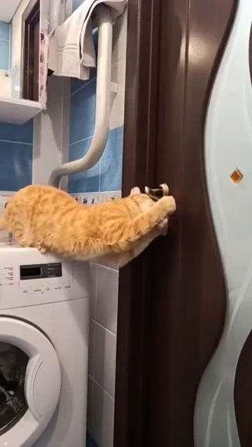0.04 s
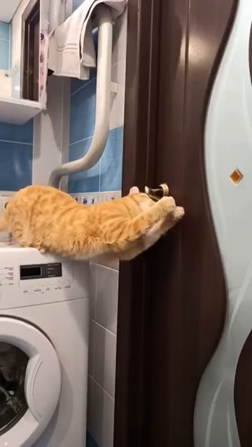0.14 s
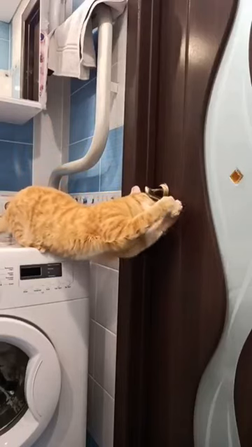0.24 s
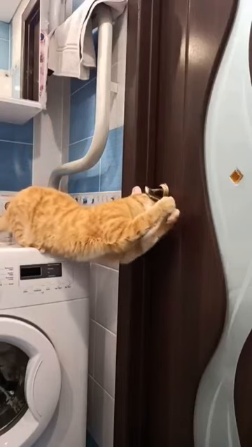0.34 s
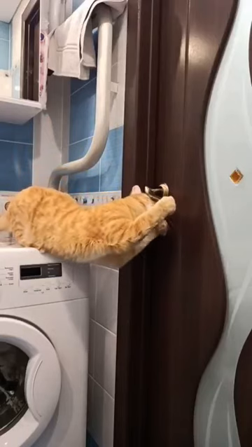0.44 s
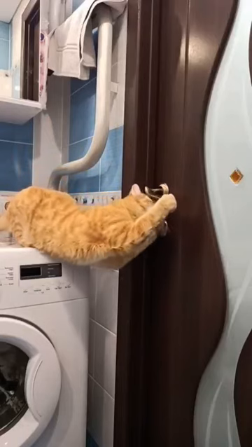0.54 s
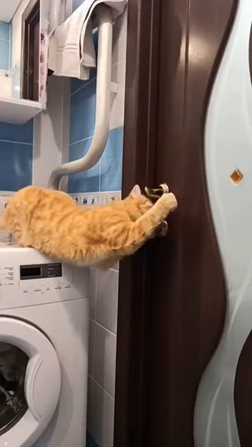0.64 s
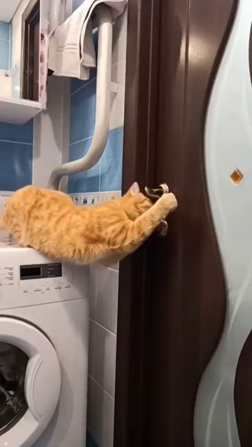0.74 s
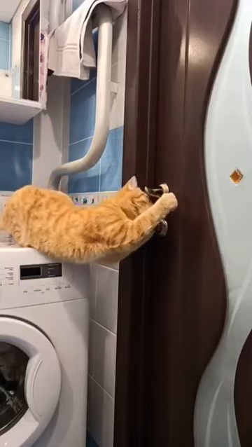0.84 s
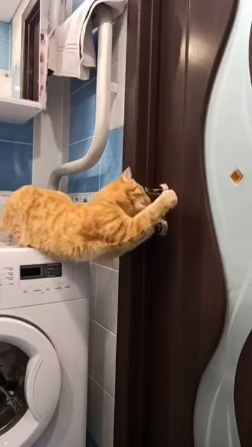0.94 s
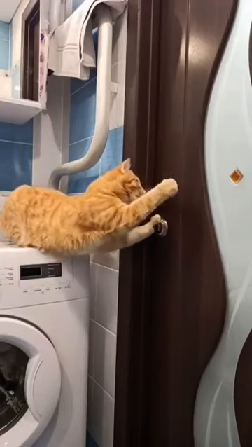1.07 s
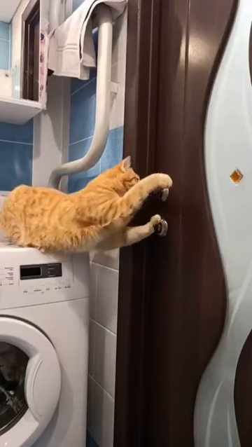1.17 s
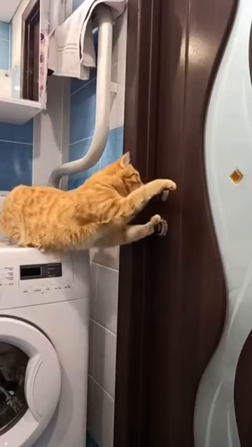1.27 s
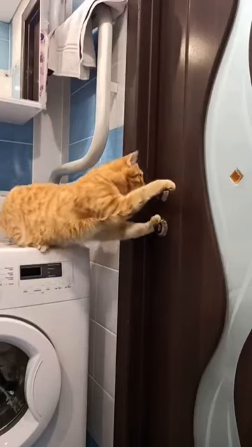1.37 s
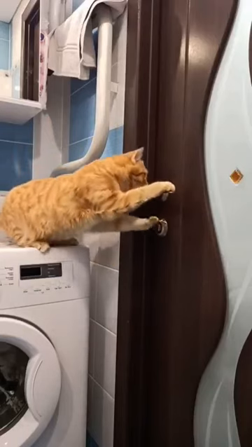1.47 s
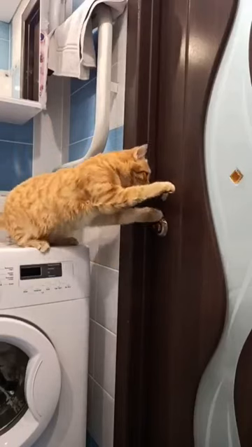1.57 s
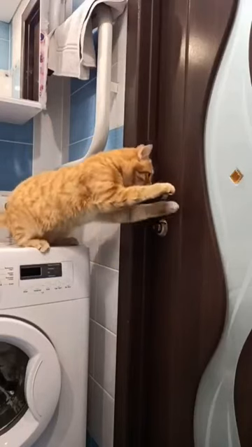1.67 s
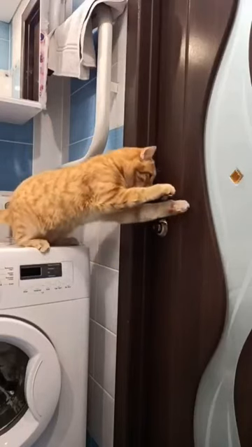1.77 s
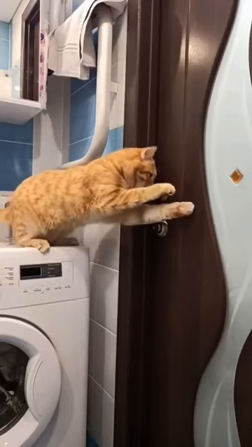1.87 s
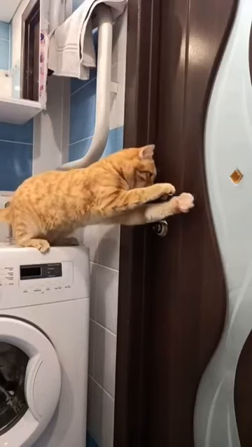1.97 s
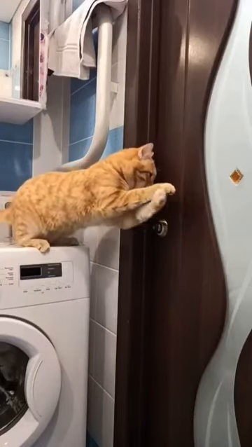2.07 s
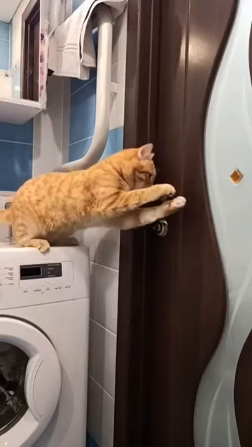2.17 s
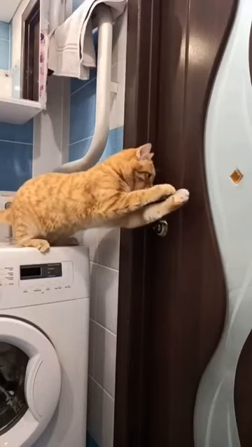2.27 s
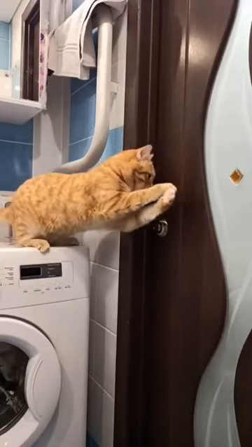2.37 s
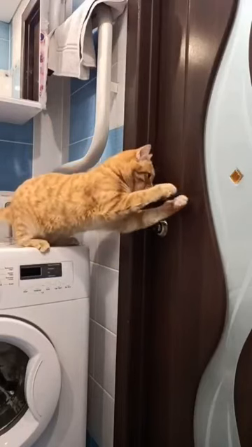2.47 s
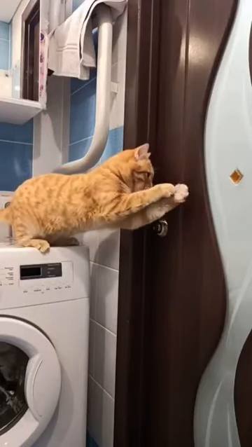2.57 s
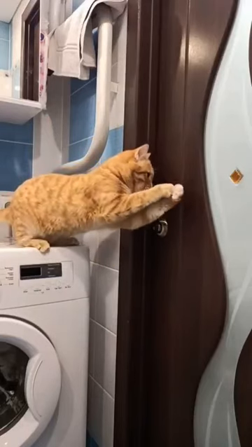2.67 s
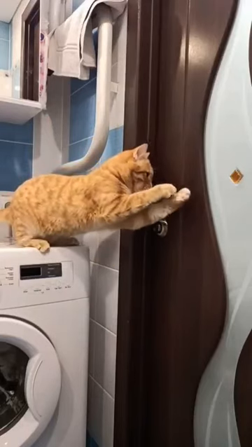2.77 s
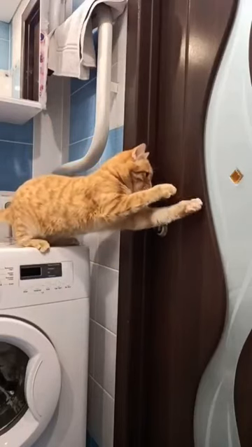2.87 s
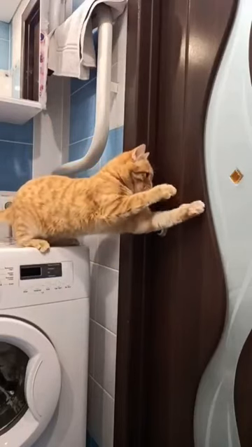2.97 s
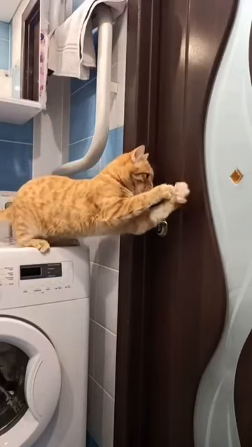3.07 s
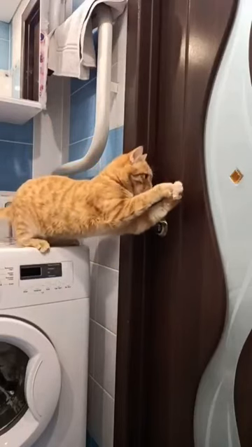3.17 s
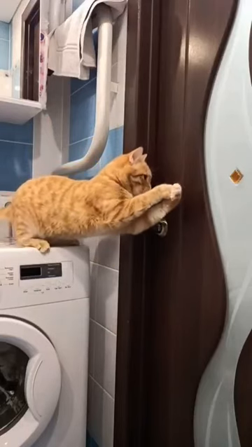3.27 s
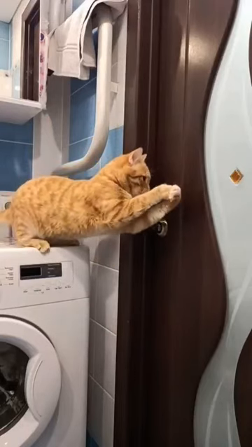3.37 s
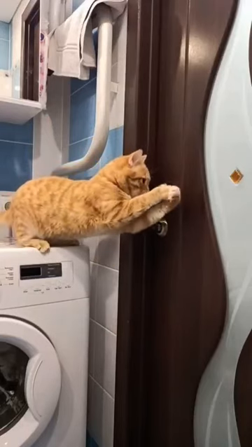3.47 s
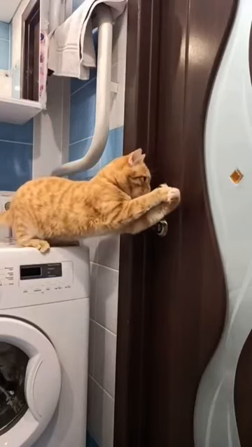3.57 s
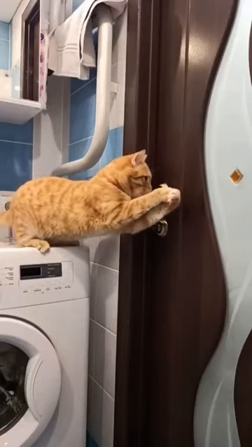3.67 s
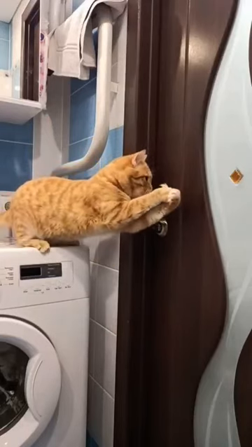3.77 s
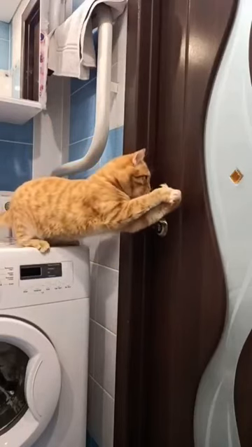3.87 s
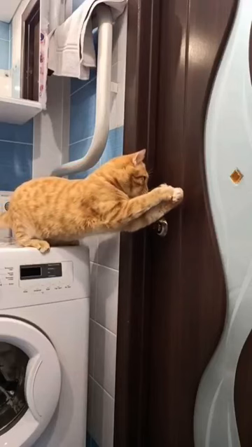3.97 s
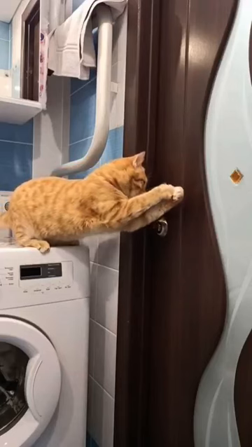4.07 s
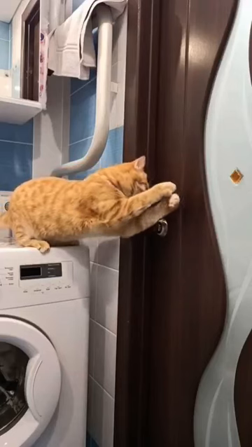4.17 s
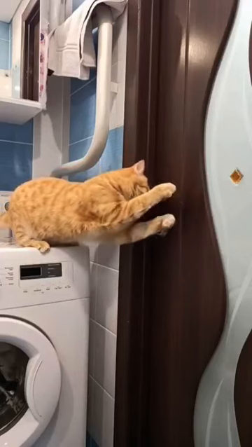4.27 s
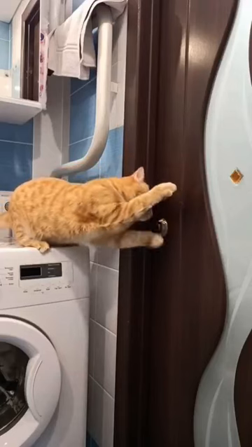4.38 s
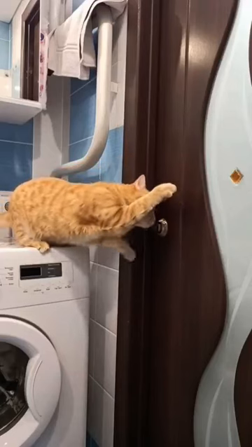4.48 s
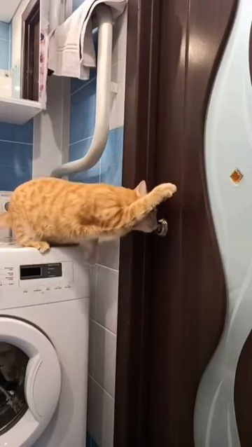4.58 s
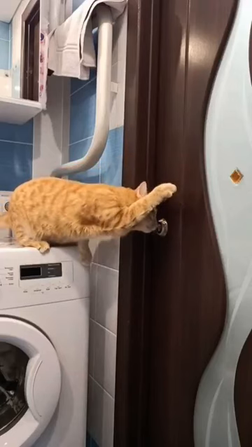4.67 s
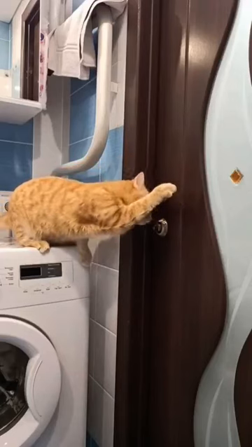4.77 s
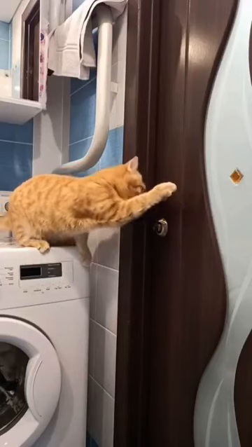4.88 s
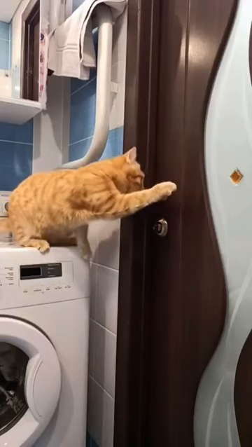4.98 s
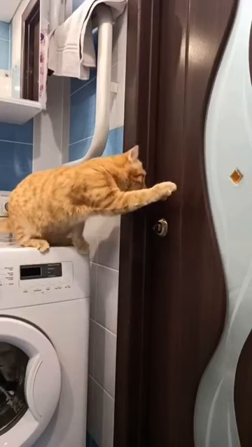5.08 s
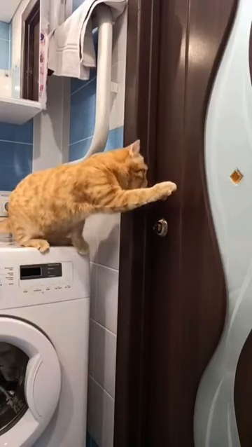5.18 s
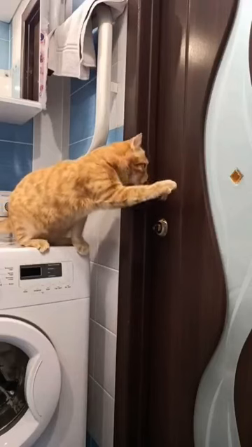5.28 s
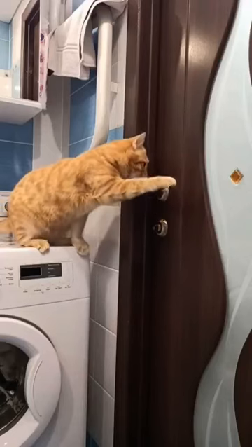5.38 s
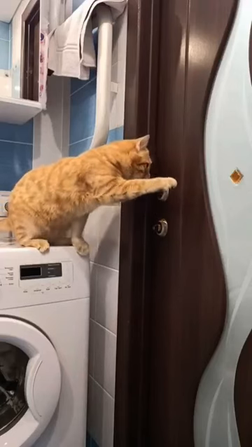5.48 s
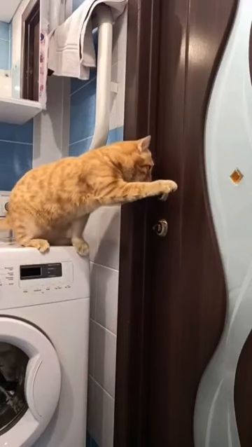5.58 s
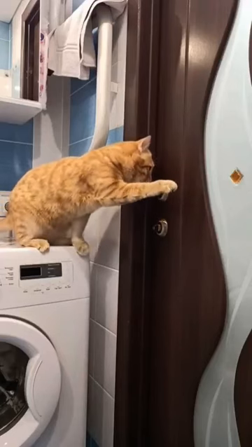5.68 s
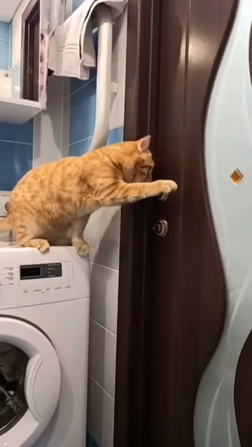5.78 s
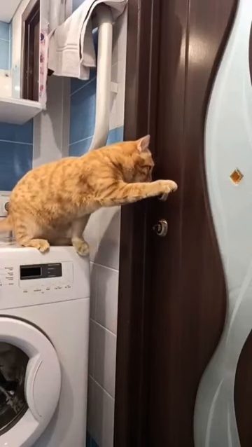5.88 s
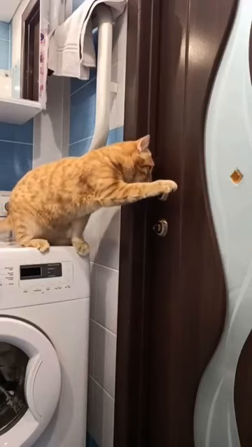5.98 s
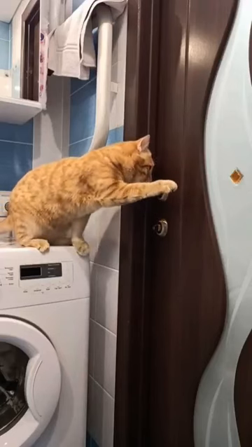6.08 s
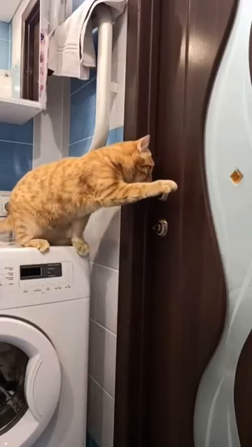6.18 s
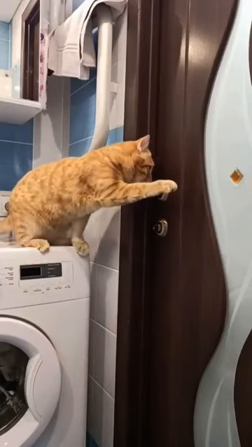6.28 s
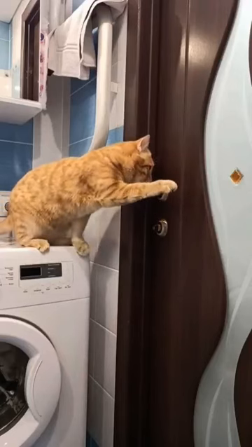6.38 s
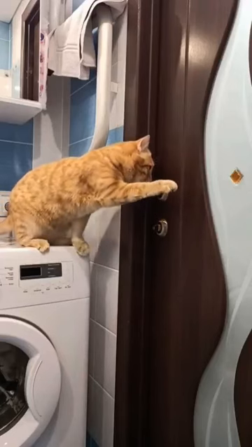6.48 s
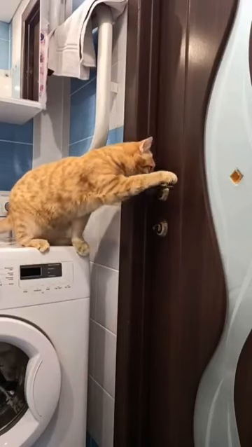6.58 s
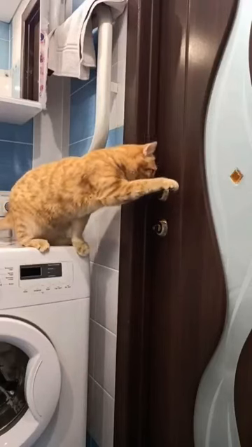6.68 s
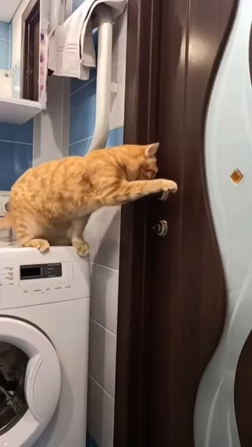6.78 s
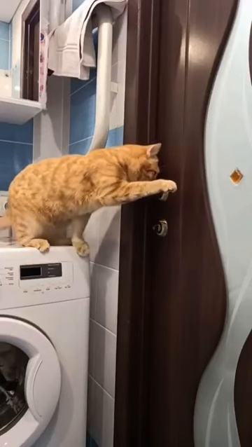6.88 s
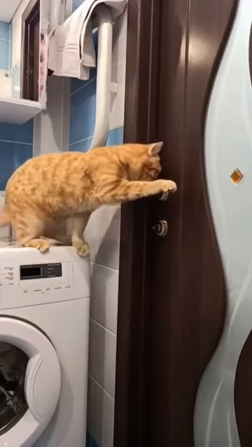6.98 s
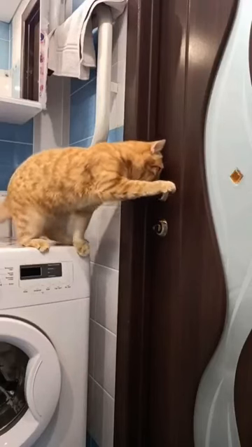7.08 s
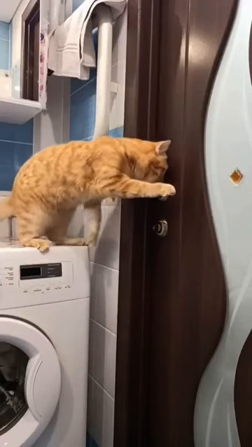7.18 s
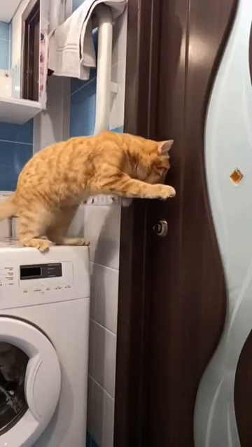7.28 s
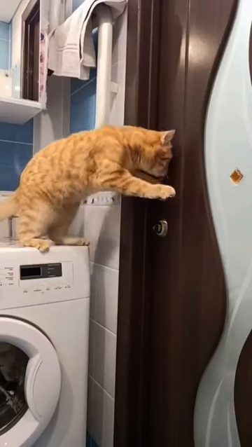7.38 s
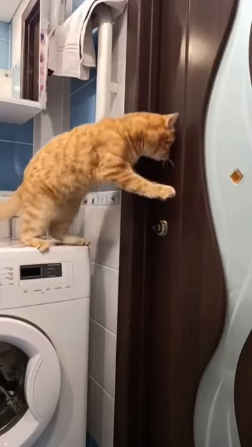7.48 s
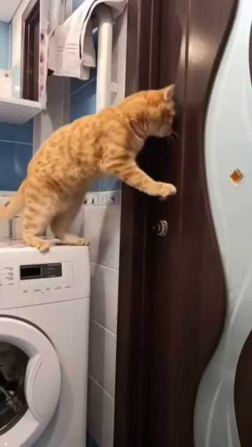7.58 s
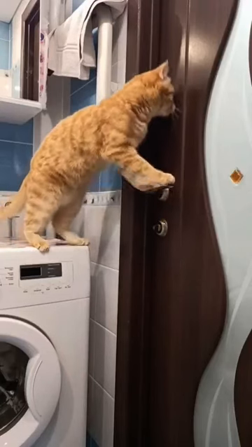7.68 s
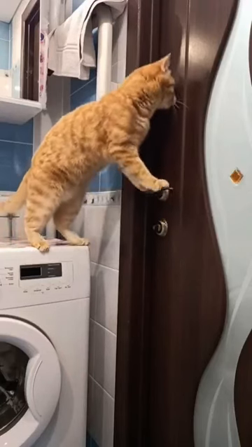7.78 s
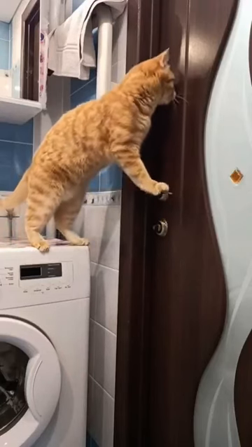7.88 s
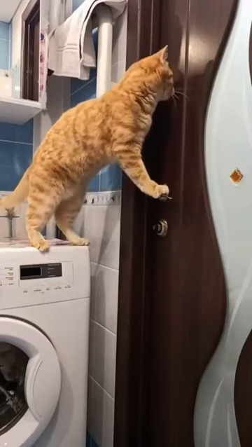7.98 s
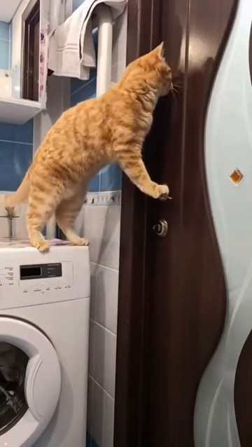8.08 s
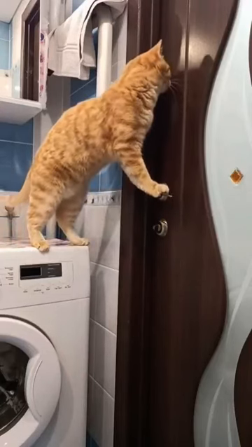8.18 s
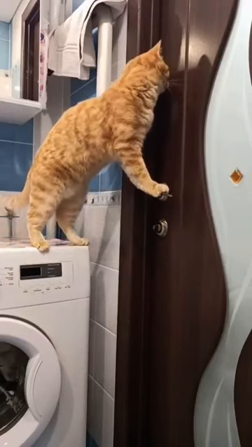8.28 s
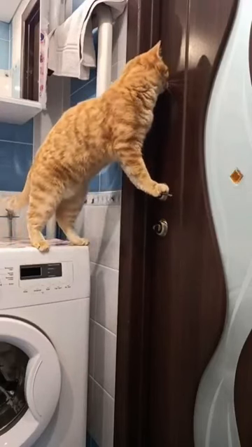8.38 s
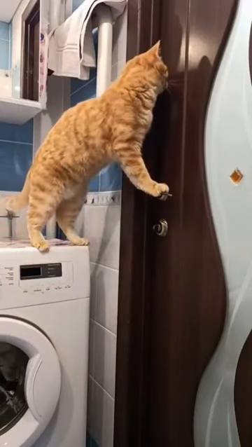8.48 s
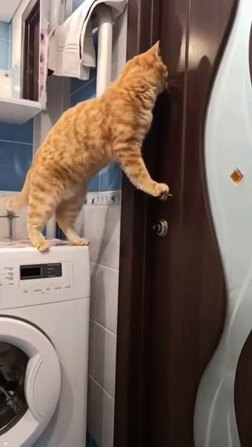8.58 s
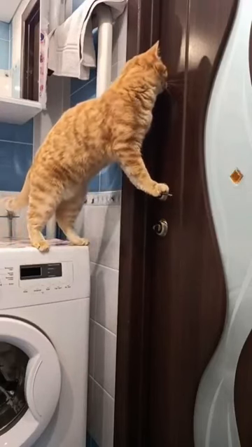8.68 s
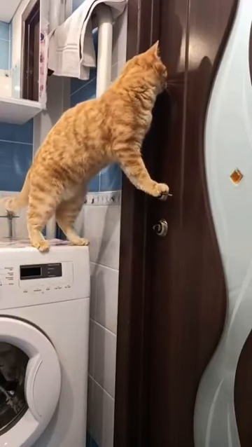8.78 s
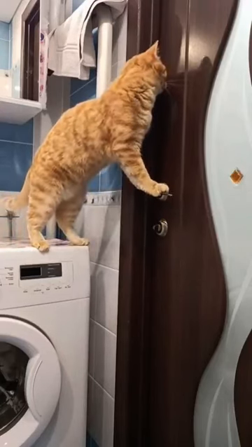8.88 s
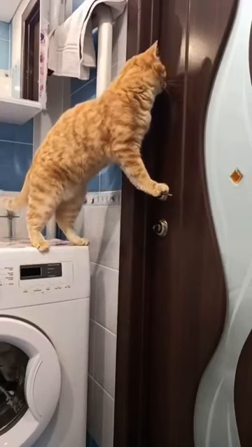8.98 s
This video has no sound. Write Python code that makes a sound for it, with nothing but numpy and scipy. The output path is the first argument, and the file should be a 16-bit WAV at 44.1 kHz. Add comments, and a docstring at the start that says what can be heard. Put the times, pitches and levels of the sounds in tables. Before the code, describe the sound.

A small tiled bathroom, heard fairly close in stereo, with faint low hum and soft hiss. A cat's shifting paws keep a wooden door booming very softly while fur rubs lightly. At 0.4-0.5 s the metal lever jiggles faintly; around 0.7-0.95 s a light claw drag and quick ticks run into the loudest clack, with a knock and padded thud. A strong rattle bumps the door at 1.15, a small crisp release snaps at 1.6, and a looser rattle follows at 1.9. From 2.2 to 5 it is mostly quiet: gentle pats, tiny ticks, a short claw scrape at 2.85, a click at 3.5. The lever springs back with hard clacks, hollow wooden knocks and thin high zings at 5.3, 6.45 and 7.55. A faint tick and scratch at 7.8 end the activity, leaving quiet room tone. Short, slightly bright reflections follow the impacts.

```python
"""A cat on a washing machine paws at the lever handle of a wooden door in a small tiled bathroom.
A low room hum and microphone hiss lie under everything; shifting paws make the door boom softly, fur rubs.
Jogs of the lever come first: metal chatters in dense and struck rings, the door sways, thuds and knocks.
Then ticks, dragged claws and soft pats join in, and the lever slips and springs back to its stop,
five times in all, each with a hard clack, a knock and a thin zing of its spring."""
import sys
import numpy as np
from scipy import signal
from scipy.fft import rfft, irfft, next_fast_len
from scipy.io import wavfile
from scipy.ndimage import uniform_filter1d

SR = 44100
rng = np.random.default_rng(int(sys.argv[2]) if len(sys.argv) > 2 else 0)


def wrap_up_sound(samples):
    """Save the sound to the file named by the first command line argument, as 16-bit audio."""
    columns = np.atleast_2d(samples).T
    # keep every value between -1 and 1, then stretch to whole-number steps
    tamed = np.clip(columns, -1, 1)
    steps = np.round(tamed * 32767).astype(np.int16)
    wavfile.write(sys.argv[1], SR, steps)


N = 398663

# spectrum of the still room with hiss: pitch_hz, density_db (per Hz, relative)
STILL_SPECTRUM = [(25, -34), (50, -22), (95, 3), (130, -1), (200, -5), (400, -11), (700, -14.5),
                  (1500, -23), (4200, -26), (5400, -34.5), (7500, -35), (10000, -20), (13500, -27.5),
                  (16000, -25.5)]
STILL_DB = -61.5
# likeness of the two microphones in the still room: pitch_hz, likeness (-1 to 1)
STILL_LIKENESS = [(60, 0.23), (300, 0.14), (1300, 0.36), (4400, 0.19), (8000, 1), (14000, 0.98)]
# lean of the still room and the shuffling: pitch_hz, left_minus_right_db
STILL_BALANCE = [(30,2.1), (70,7.5), (180,2.2), (550,2), (1650,0.76)]

# decay of the tiled room: pitch_hz, t60_s
ROOM_DECAY = [(80, 0.8), (210, 0.57), (560, 0.19), (1470, 0.45), (3880, 0.32), (12000, 0.34)]
# likeness of the two microphones for all rings: pitch_hz, likeness (-1 to 1)
RING_LIKENESS = [(60,1), (200,0.97), (400,0.85), (700,0.32), (1300,-0.2), (2400,-0.014), (4400,0.02),
                 (8000,1), (15000,0.82)]
# lean of the blows: pitch_hz, left_minus_right_db
BLOW_LEAN = [(70,0.5), (150,1), (350,-2.5), (700,-0.5), (1400,-0.5), (2800,-1), (4800,-2), (8000,-1.7),
             (13000,-5)]

# door and room booming together: pitch_hz, level_db (relative), t60_s
BOOM_MODES = [(77.8,-3,0.74), (98.1,5,0.63), (165.6,8.5,0.51), (191.7,0,1), (234.8,4,0.54),
              (255.8,-2.5,0.92), (291.8,-5,0.79), (336.4,-7,0.4), (378.6,-2,0.49), (421.4,-0.5,0.37),
              (447.3,5,0.33), (475,1.5,0.3), (528,-2.5,0.083), (601.3,1.5,0.26), (780,-10,0.5),
              (893,-5,0.32), (978,-9,0.13), (1120,-2,0.35)]
# struck lever and latch: pitch_hz, level_db (relative), t60_s
LEVER_MODES = [(1402,-8,0.42), (2084,11.5,0.16), (2142,10,0.31), (2700,5,0.14), (3220,5,0.18),
               (3693,14.5,0.074), (4460,-26,.25), (4590,0,0.17), (4750,-18,0.19), (6030,-17,0.33)]
# dense ring of the wood: pitch_hz, density_db (per Hz, relative)
WOOD_SPECTRUM = [(45,-27), (100,-5), (200,0), (450,2), (620,-5), (800,-6.5), (1500,-8), (3000,-29)]
# dense ring of the metal: pitch_hz, density_db (per Hz, relative)
METAL_SPECTRUM = [(400,2.5), (1000,2.5), (1500,0), (2000,14.5), (3500,8.5), (4650,2.5), (5050,-15),
                  (5900,-7.5), (6250,-3), (8300,-9.5), (13500,-57), (16000,-19)]
# fur and pads rubbing: pitch_hz, density_db (per Hz, relative)
RUB_SPECTRUM = [(300, 6), (1000, -4.5), (3800, -2.5), (5400, -4.5), (7500, 4.5), (15000, -72)]
# claw on lever and varnish: pitch_hz, density_db (per Hz, relative)
CLAW_SPECTRUM = [(600,-26), (1500,-5.5), (2300,-4.5), (3100,3.5), (3700,-2), (4400,-3), (5400,-15),
                 (7000,-7.5), (13000,-27)]
# ring of the lever's return spring: pitch_hz, density_db (per Hz, relative)
SPRING_SPECTRUM = [(9000,-41), (11800,-1), (13200,7), (14500,0), (16000,-6.5)]

# the cat's weight shifting on its paws: time_s, boom_level_db
WEIGHT_SHIFTS = [(0,-62.5), (0.8,-62.5), (1.1,-60), (1.4,-65.5), (2.35,-62), (2.7,-64.5), (3.35,-63),
                 (3.9,-67), (4.2,-81), (4.7,-70), (4.9,-55.5), (5.1,-61.5), (5.45,-49.5), (5.65,-65.5),
                 (6.75,-62), (7.45,-65), (7.8,-55), (8.05,-65)]
RUB_DB, RUB_FOLLOWS = -72, 0.26   # rub at mean weight, before brushes; share of the weight's swing in dB
# fur brushing along the door: middle_s, half_length_s, rise_db
FUR_BRUSHES = [(0.724,0.23,6), (2.95,0.11,7), (3.68,0.38,2), (4.057,.04,6), (4.3,0.17,7.5), (4.717,.14,9)]

# a paw jogs the lever, which chatters and bumps the door: start_s, metal_db, hardness_db, door_db
LEVER_JOGS = [(0.364,-65,6,-64), (0.481,-59.5,8,-72), (1.163,-39,6.5,-37), (1.904,-47,1.5,-48.5),
              (2.379,-59.5,-3,-56), (2.506,-60.5,-1,-52), (4.329,-63,-10,-57), (5.185,-55.5,-10,-55.5),
              (5.474,-58,3,-53.5), (6.642,-66,-3,-56), (7.096,-63.5,1,-60)]
JOG_CHATTER_S, JOG_SWAY_DB, JOG_THUD_DB = 0.018, -16, -4.5   # sway and thud against the knock
# claws and latch tick on the metal, hardly moving the door: start_s, metal_db, hardness_db
METAL_TICKS = [(0.701,-62,13.5), (0.841,-46,-6), (0.904,-44,-4), (0.926,-35.5,-9), (0.948,-37,-4),
               (2.177,-60,2), (2.82,-59,2.5), (3.471,-50,1.5), (7.795,-56.5,2)]
TICK_CHATTER_S, TICK_DOOR_DB = 0.004, -11.5   # door against the metal level
# claws dragged over lever and door: start_s, length_s, peak_db (loudest short-term rms)
CLAW_SCRAPES = [(0.742,0.23,-62), (2.847,.11,-47), (3.757,0.075,-68.5), (7.1,0.076,-66.5), (7.8,0.087,-56)]
# the lever slips from the paw and springs back to its stop: stop_s, metal_db, hardness_db, door_db,
# thud_under_knock_db, spring_db, travel_s (slip to stop), first_rattle_under_stop_db
LEVER_RELEASES = [(0.911,-29,2.5,-36,2,-51,0.033,11), (1.6234,-43,11.5,-55.5,1,-54.5,0.0025,14),
                  (5.281,-36,-2,-32,20,-53,.008,-0.5), (6.445,-39,5,-30,13,-62,0.017,15),
                  (7.568,-43,4.5,-32,8.5,-54,0.027,3)]
STOP_CHATTER_S, STOP_SWAY_DB = 0.0065, -17.5   # sway against the knock
TRAVEL_CHATTER_S, TRAVEL_DOOR_DB = 0.015, -8.5   # the moving lever shakes the door less than the stop does
# a padded paw lands on the door: start_s, thud_db, sway_against_thud_db
PAW_PATS = [(0.944,-37,-22), (2.204,-50.5,-5.5), (2.985,-46,-30), (4.181,-53.5,-30), (4.295,-57,-4.5),
            (4.342,-64,13), (4.999,-53.5,-16), (5.186,-50,-29), (7.239,-57.5,-15)]
PAT_KNOCK_DB = -8.5   # against the thud

# clack and snap against the tick; each dB of hardness adds a dB of snap and thins the clack
CLACK_DB, SNAP_DB, CLACK_LOSS_PER_DB = -1, -10, 0.29
# weight of the first touch in the chatter: metal that slaps, a lever eased into motion
SLAP_FIRST, EASE_FIRST = 2.1, 0.8
CUTOFF_HZ = 15800


def from_db(db):
    """Turns decibels into gain."""
    return np.exp(np.asarray(db) * np.log(10) / 20)


def rms_one(x):
    """Scales a sound to rms 1."""
    return x / np.sqrt(np.mean(x ** 2) + 1e-20)


def at_hz(points, hz):
    """Reads a table on a log-frequency axis."""
    table = np.array(points)
    return np.interp(np.log(hz), np.log(table[:, 0]), table[:, 1])


def filtered(x, hz, kind, order=2):
    """Runs a causal Butterworth filter."""
    return signal.sosfilt(signal.butter(order, hz, kind, fs=SR, output="sos"), x)


def add(track, s, sound):
    """Mixes a sound into a track from a given time on."""
    start = max(round(s * SR), 0)
    track[..., start:start + sound.shape[-1]] += sound[..., :N - start]


def stereo_noise(spectrum, likeness, size):
    """Coloured noise at two microphones, partly alike, with rms 1."""
    padded = next_fast_len(size)
    mid, side = rfft(rng.standard_normal((2, padded)))
    hz = np.maximum(np.arange(len(mid)) * SR / padded, 1)
    alike = np.clip(at_hz(likeness, hz), -1, 1)
    both = np.sqrt(1 + alike) * mid + np.sqrt(1 - alike) * side * [[1], [-1]]
    coloured = both * from_db(at_hz(spectrum, hz))
    return rms_one(irfft(coloured, padded)[:, :size])


def room_ring(spectrum):
    """One second of dense reflections, each register dying at its own pace."""
    t = np.arange(SR) / SR
    rest, out = stereo_noise(spectrum, RING_LIKENESS, SR), 0
    # peel the registers off from the bottom up
    for hz in (90, 200, 450, 1200, 4000):
        lowpass = signal.butter(2, 1.5 * hz, fs=SR, output="sos")
        band = signal.sosfiltfilt(lowpass, rest)
        rest = rest - band
        out = out + band * from_db(-60 * t / at_hz(ROOM_DECAY, hz))
    return rms_one(out + rest * from_db(-60 * t / ROOM_DECAY[-1][1]))


def mode_ring(modes, swell_cycles):
    """One second of struck modes; each swells over a few cycles and meets the microphones out of step."""
    t, out = np.arange(SR) / SR, 0
    for k, (hz, db, t60) in enumerate(modes):
        sign = (-1) ** k
        alike = np.clip(at_hz(RING_LIKENESS, hz), -1, 1)
        apart = np.arccos(alike) / 2 * np.array([[1], [-1]]) * sign
        swell = 1 - np.exp(-t * hz / swell_cycles)
        envelope = swell * from_db(db - 60 * t / t60)
        out = out + sign * envelope * np.sin(2 * np.pi * hz * t + apart)
    return rms_one(out)


def strike_level(response):
    """Scales a ring so that its first 40 ms have rms 1."""
    return response / np.sqrt(np.mean(response[:, :SR // 25] ** 2))


def leaning(stereo, balance):
    """Tilts each pitch a little towards one microphone or the other."""
    padded = next_fast_len(stereo.shape[-1] + 2000)
    spectrum = rfft(stereo, padded)
    hz = np.maximum(np.arange(spectrum.shape[-1]) * SR / padded, 1)
    db = at_hz(balance, hz)
    return irfft(spectrum * from_db([db / 2, -db / 2]), padded)[:, :stereo.shape[-1]]


def still_room():
    """Low hum and hiss as steady coloured noise."""
    return from_db(STILL_DB) * stereo_noise(STILL_SPECTRUM, STILL_LIKENESS, N)


def shuffling(steps_per_s=160, soft_hz=330, dense_db=0.0, catches_per_s=900):
    """Padded paws keep the door faintly booming, while fur and pads catch in tiny grains."""
    t = np.arange(N) / SR
    weight_db = np.interp(t, *np.transpose(WEIGHT_SHIFTS))
    brush_db = sum(db * np.exp(-((t - s) / half_s) ** 2) for s, half_s, db in FUR_BRUSHES)
    rub_db = RUB_DB + RUB_FOLLOWS * (weight_db - weight_db.mean()) + brush_db

    # sparse random impulses: paw steps and fur catches
    chance = np.array([[steps_per_s], [catches_per_s]]) / SR
    steps, catches = rng.standard_normal((2, N)) * (rng.random((2, N)) < chance)

    wood = mode_ring(BOOM_MODES, swell_cycles=0.87) + from_db(dense_db) * room_ring(WOOD_SPECTRUM)
    soft_wood = filtered(wood, soft_hz, "low", order=1)
    boom = rms_one(signal.oaconvolve(soft_wood, steps[None], axes=1)[:, :N])
    rub = rms_one(signal.oaconvolve(room_ring(RUB_SPECTRUM), catches[None], axes=1)[:, :N])
    return from_db(weight_db) * boom + from_db(rub_db) * rub


def clicks():
    """Lists every touch of metal: start_s, clack_db, tick_db, snap_db, chatter_s, first_touch."""
    touches = [(s, db, hard_db, JOG_CHATTER_S, EASE_FIRST) for s, db, hard_db, _ in LEVER_JOGS]
    touches += [(s, db, hard_db, TICK_CHATTER_S, SLAP_FIRST) for s, db, hard_db in METAL_TICKS]
    for s, db, hard_db, _, _, _, travel_s, softer_db in LEVER_RELEASES:
        touches.append((s - travel_s, db - softer_db, hard_db, TRAVEL_CHATTER_S, EASE_FIRST))
        touches.append((s, db, hard_db, STOP_CHATTER_S, SLAP_FIRST))
    rows = []
    for s, db, hard_db, length_s, first in touches:
        clack_db = db + CLACK_DB - CLACK_LOSS_PER_DB * hard_db
        snap_db = db + SNAP_DB + hard_db
        rows.append((s, clack_db, db, snap_db, length_s, first))
    return rows


def chatter(length_s, draws, first, uneven_db=2.5):
    """A first touch and a thinning run of uneven rebounds, with unit energy."""
    when, size = draws
    force = np.zeros(SR // 10)
    at = np.clip(np.abs(when) * length_s * SR, 0, len(force) - 1).astype(int)
    force[at] = np.sign(size) * from_db(uneven_db * np.minimum(np.abs(size), 2))
    force[0] = first
    return force / np.sqrt(np.sum(force ** 2))


def handle(modes_db=-4.5, direct_db=0.5, direct_s=0.00053, clack_hz=800, tick_hz=1800, snap_hz=5400):
    """Loose metal chatters on every touch; the harder the contact, the more its top rings."""
    out, voices = np.zeros((2, N)), []
    modes = from_db(modes_db) * mode_ring(LEVER_MODES, swell_cycles=0.73)
    # five variants of the ring take turns
    for _ in range(5):
        ring = room_ring(METAL_SPECTRUM) + modes
        clack = filtered(ring, [clack_hz, tick_hz], "band", order=2)
        tick = filtered(filtered(ring, tick_hz, "high"), snap_hz, "low", order=3)
        snap = filtered(ring, snap_hz, "high", order=4)
        voices.append(np.array([strike_level(part) for part in (clack, tick, snap)]))

    touches = clicks()
    draws = rng.standard_normal((len(touches), 2, 8))   # time and size of eight rebounds
    crack = from_db(direct_db) * np.exp(-np.arange(SR // 50) / SR / direct_s)
    for k, (s, *levels_db, length_s, first) in enumerate(touches):
        touch = np.tensordot(from_db(levels_db), voices[k % len(voices)], 1)
        force = chatter(length_s, draws[k], first)
        # every rebound arrives as a short crack, and the ring fills up with their summed energy
        add(out, s, signal.fftconvolve(touch[:, :len(crack)] * crack, force[None], axes=1))
        energy = np.interp(np.arange(SR), np.arange(len(force)), np.cumsum(force ** 2))
        add(out, s, touch * np.sqrt(energy))
    return out


def knocks():
    """Lists every contact that reaches the door: start_s, sway_db, thud_db, knock_db."""
    bumps = [(s, db) for s, _, _, db in LEVER_JOGS]
    bumps += [(s, db + TICK_DOOR_DB) for s, db, _ in METAL_TICKS]
    rows = [(s, db + JOG_SWAY_DB, db + JOG_THUD_DB, db) for s, db in bumps]
    for s, _, _, db, under_db, _, travel_s, softer_db in LEVER_RELEASES:
        stop = np.array([db + STOP_SWAY_DB, db - under_db, db])
        rows.append((s - travel_s, *(stop - softer_db + TRAVEL_DOOR_DB)))
        rows.append((s, *stop))
    return rows + [(s, db + sway_db, db, db + PAT_KNOCK_DB) for s, db, sway_db in PAW_PATS]


def door(dense_db=-2.5, swell_s=0.001, sway_hz=125, thud_hz=315, dull_hz=800):
    """Soft shoves wake the lowest modes, hard stops the wooden middle."""
    out, voices = np.zeros((2, N)), []
    modes = mode_ring(BOOM_MODES, swell_cycles=2.76)
    swell = 1 - np.exp(-np.arange(SR) / SR / swell_s)
    # four variants with different scatter take turns
    for _ in range(4):
        ring = modes + from_db(dense_db) * swell * room_ring(WOOD_SPECTRUM)
        sway = filtered(ring, sway_hz, "low", order=4)
        thud = filtered(ring, [sway_hz, thud_hz], "band", order=3)
        knock = filtered(filtered(ring, thud_hz, "high", order=5), dull_hz, "low")
        voices.append(np.array([strike_level(part) for part in (sway, thud, knock)]))
    for k, (s, *levels_db) in enumerate(knocks()):
        add(out, s, np.tensordot(from_db(levels_db), voices[k % len(voices)], 1))
    return out


def claws(slips_per_s=1300):
    """A claw sticks and slips in quick tiny ticks that swell and fade with the stroke."""
    out, ring = np.zeros((2, N)), room_ring(CLAW_SPECTRUM)
    slips = rng.standard_normal(N) * (rng.random(N) < slips_per_s / SR)
    for s, length_s, db in CLAW_SCRAPES:
        start, size = round(s * SR), round(length_s * SR)
        drag = slips[start:start + size] * np.hanning(size)
        stroke = signal.fftconvolve(ring, drag[None], axes=1)
        power = uniform_filter1d(np.mean(stroke ** 2, axis=0), size=900)
        loudest = np.sqrt(power.max() + 1e-20)
        add(out, s, from_db(db) * stroke / loudest)
    return out


def spring():
    """The released spring gives a very high, thin zing as the lever stops."""
    out, ring = np.zeros((2, N)), strike_level(room_ring(SPRING_SPECTRUM))
    for s, _, _, _, _, db, _, _ in LEVER_RELEASES:
        add(out, s, from_db(db) * ring)
    return out


def scene():
    """Lays the blows, mostly leaning slightly right, over the shuffling cat and the still room."""
    bed = still_room() + shuffling()
    blows = handle() + door() + claws() + spring()
    return leaning(bed, STILL_BALANCE) + leaning(blows, BLOW_LEAN)


def record(dry, hollow_db=-17.0):
    """Carves a steady hollow around 10 kHz into the treble and cuts the top."""
    notch = signal.ellip(6, .5, 50, [8600, 11800], "stop", fs=SR, output="sos")
    # some of the uncarved sound keeps the hollow from emptying
    coloured = signal.sosfilt(notch, dry) + from_db(hollow_db) * dry
    top_cut = signal.ellip(10, .2, 70, CUTOFF_HZ, fs=SR, output="sos")
    return signal.sosfilt(top_cut, coloured)


dry = scene()
out = record(dry)
wrap_up_sound(out)
```